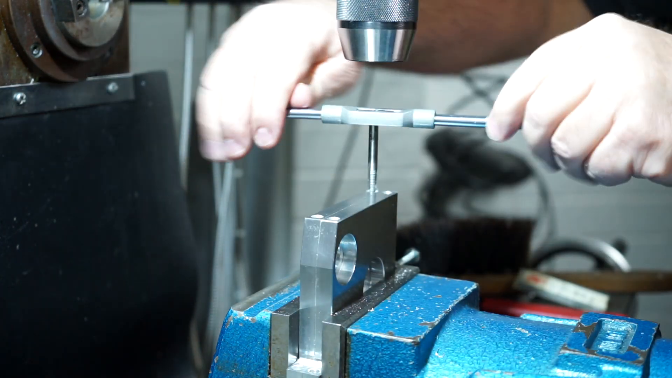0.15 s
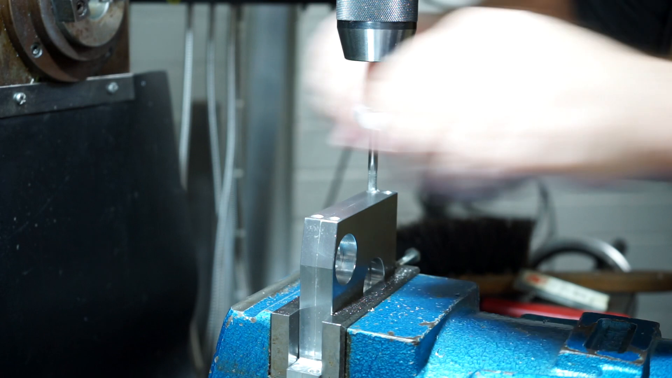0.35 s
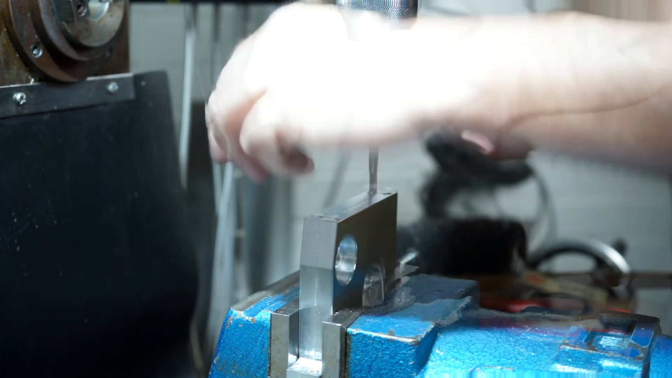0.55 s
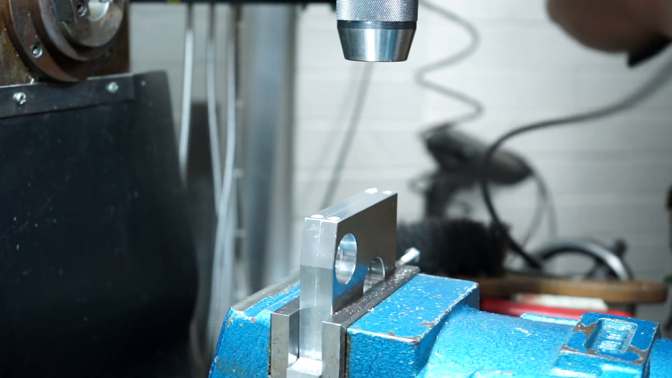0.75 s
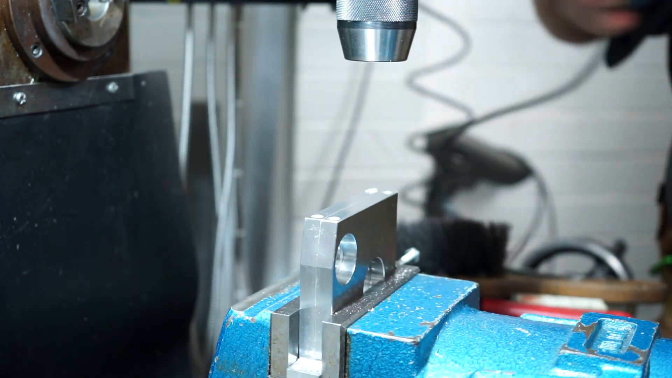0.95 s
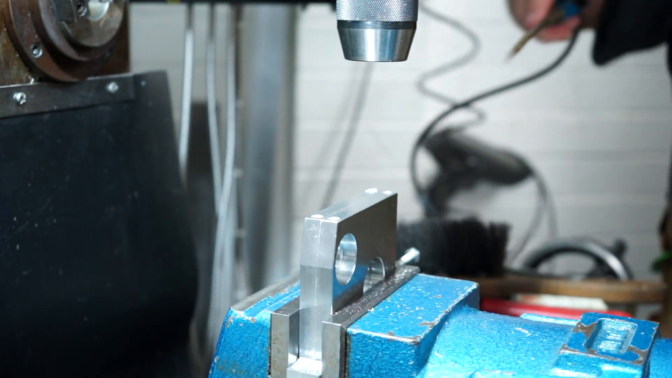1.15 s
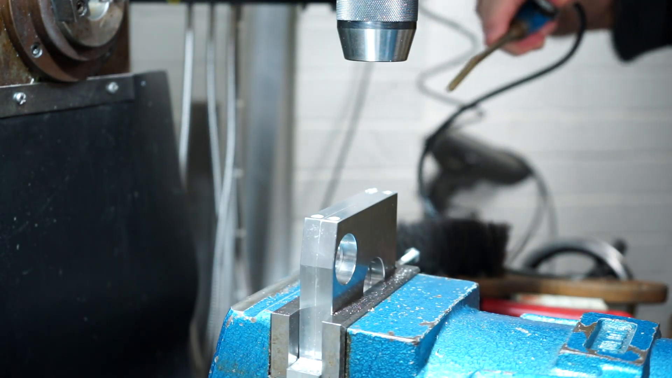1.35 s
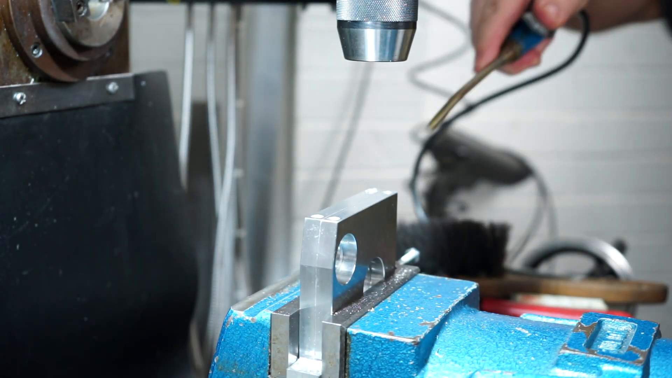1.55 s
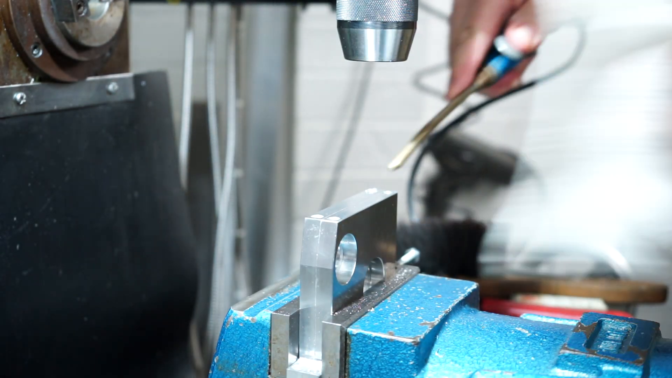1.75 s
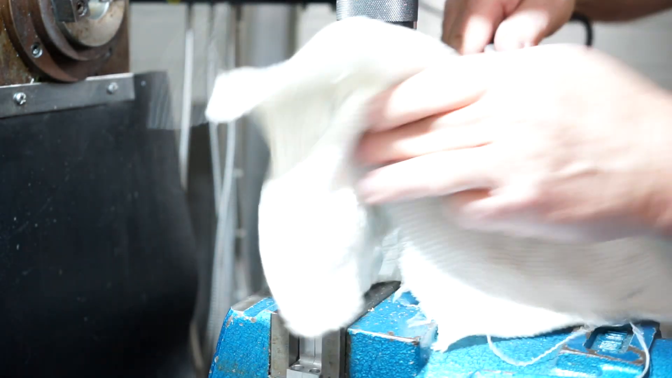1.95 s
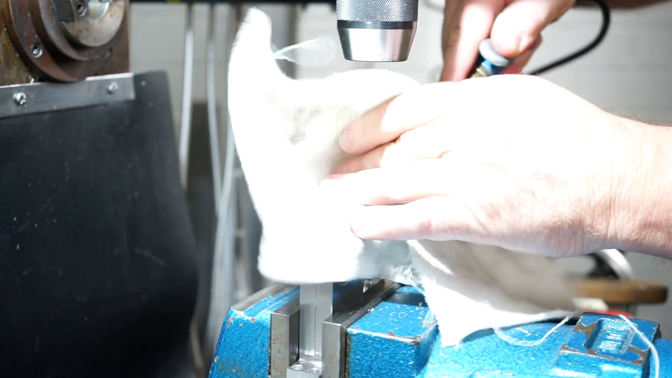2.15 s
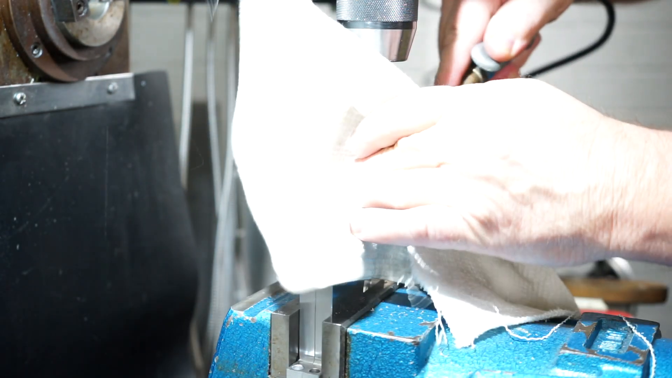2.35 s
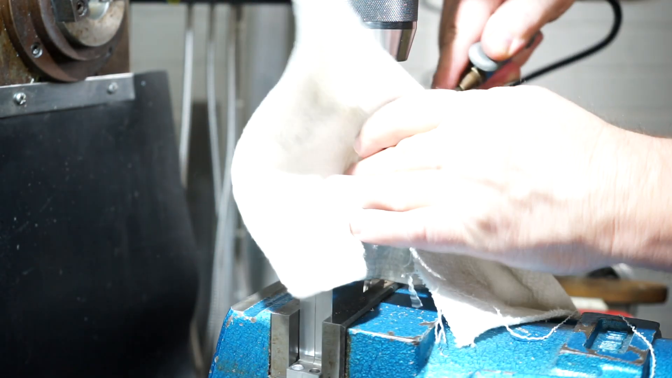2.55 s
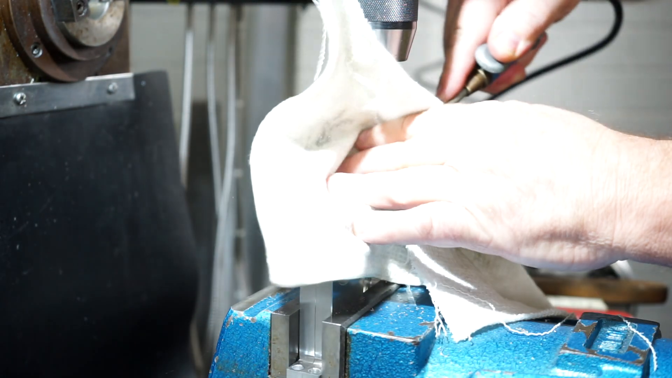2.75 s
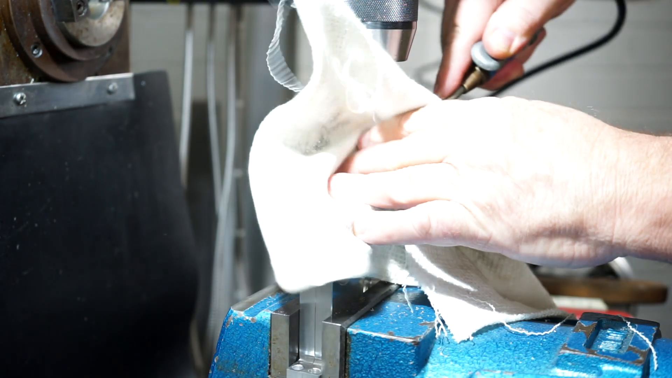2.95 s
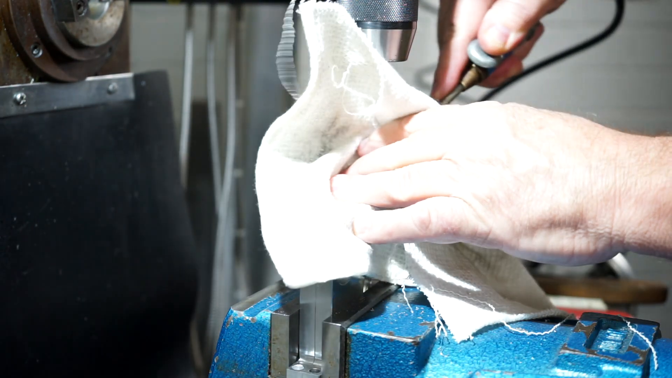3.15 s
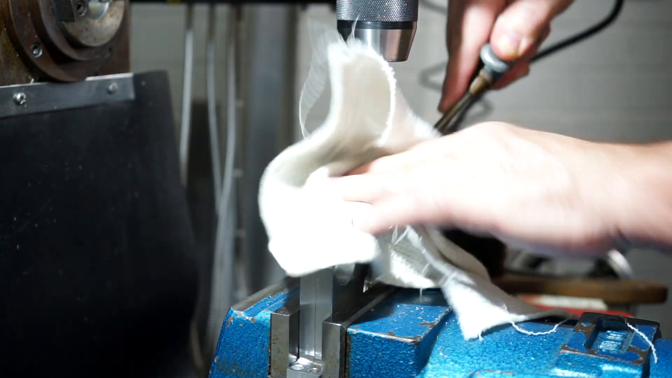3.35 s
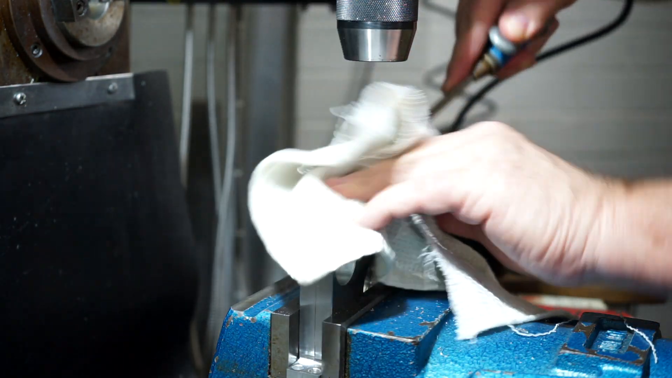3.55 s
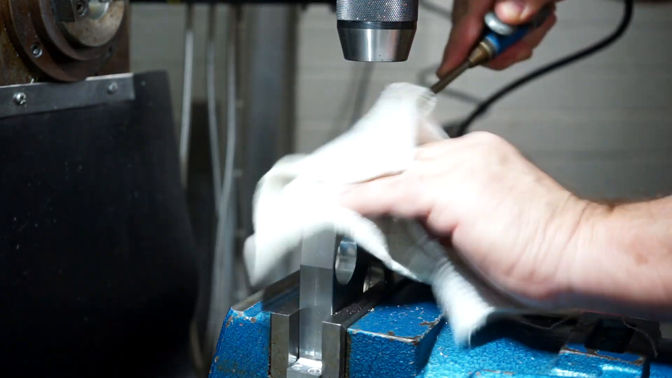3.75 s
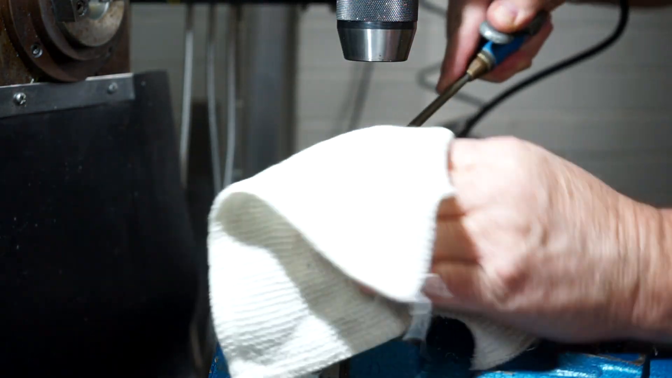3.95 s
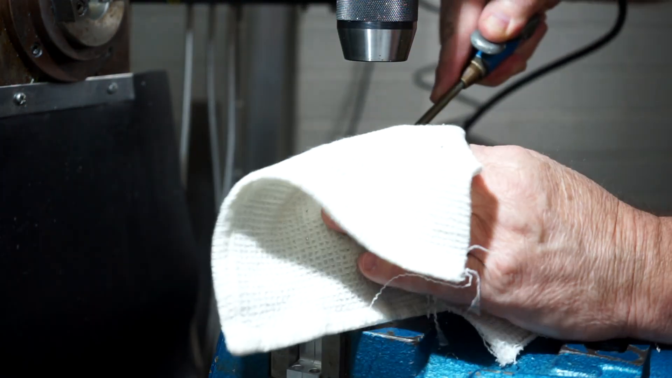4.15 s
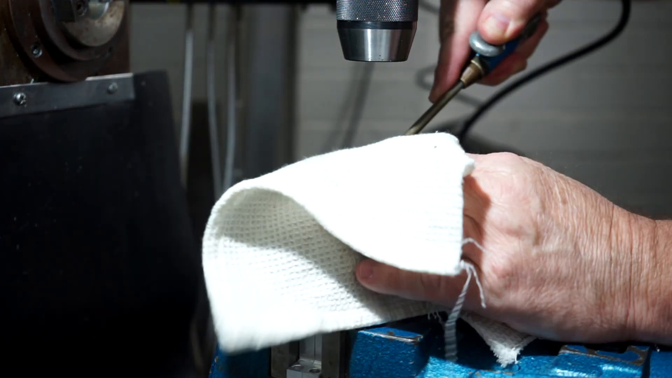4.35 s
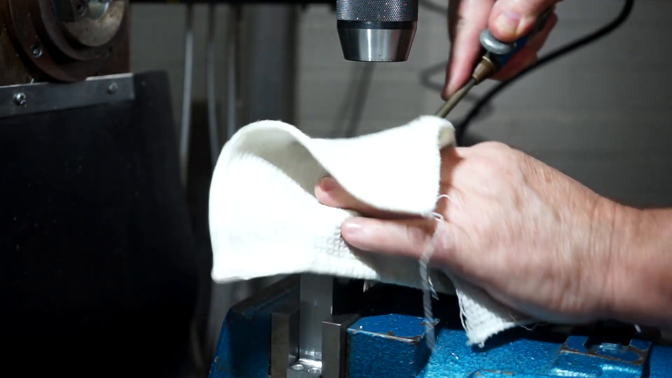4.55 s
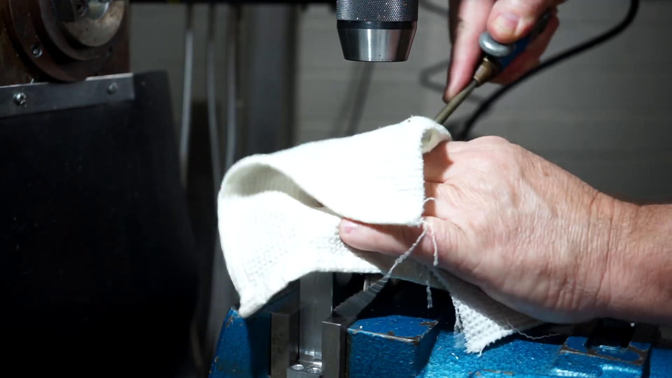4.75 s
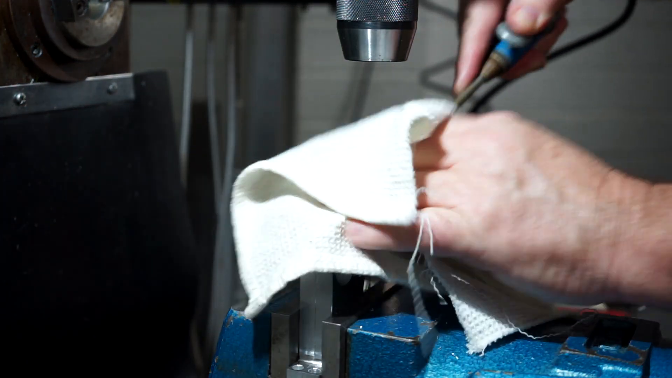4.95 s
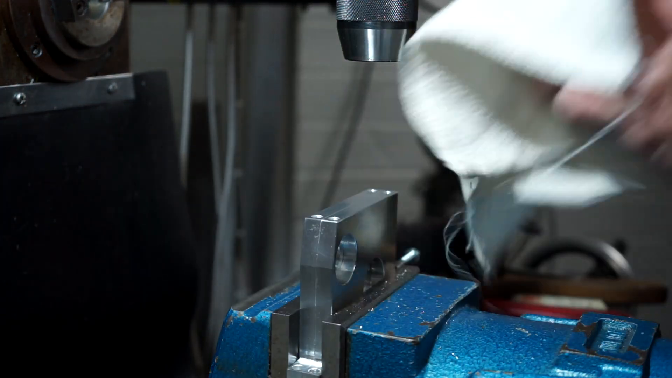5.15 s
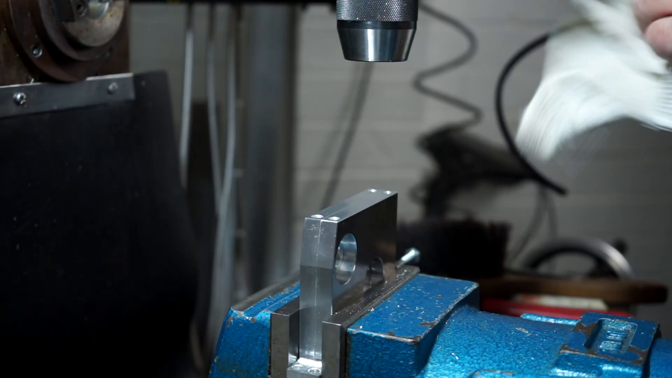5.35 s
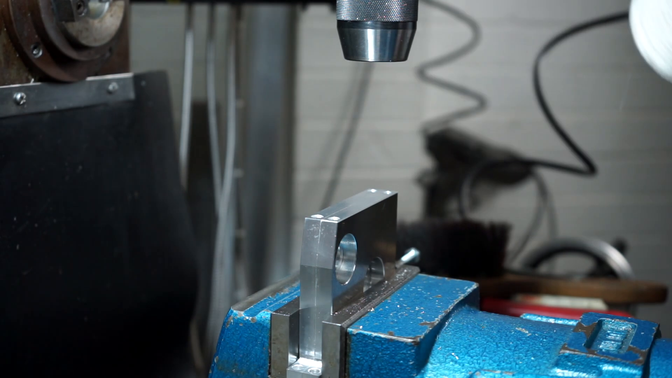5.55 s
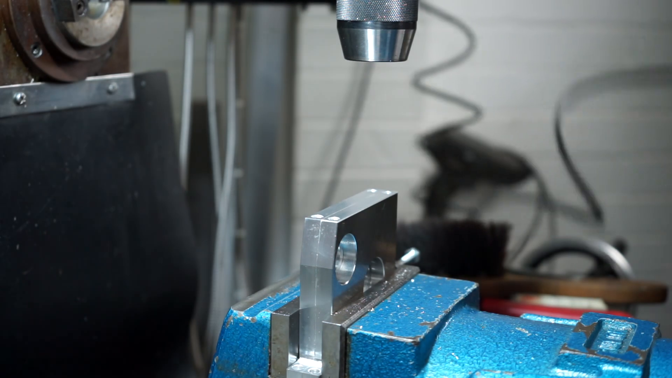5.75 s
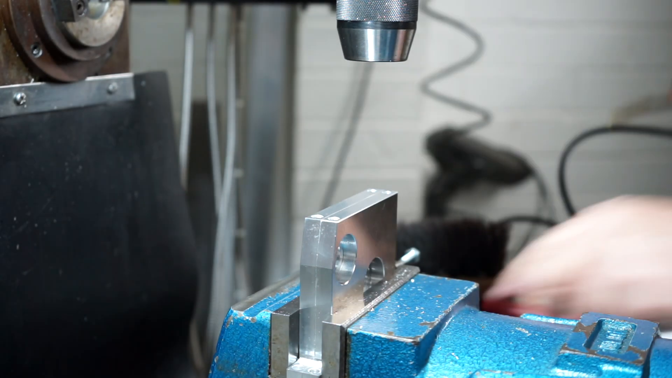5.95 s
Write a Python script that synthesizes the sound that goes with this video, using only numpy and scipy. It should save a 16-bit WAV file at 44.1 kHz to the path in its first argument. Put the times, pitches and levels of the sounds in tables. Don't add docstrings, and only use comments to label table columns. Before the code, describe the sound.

In a workshop, a motor drones while an air gun sprays twice through a rag, with piercing chirps and a leaking hiss between.

```python
import sys
import numpy as np
from scipy import signal
from scipy.io import wavfile
from scipy.ndimage import uniform_filter1d, minimum_filter1d

SR = 44100
rng = np.random.default_rng(int(sys.argv[2]) if len(sys.argv) > 2 else 0)


def store_pcm(level_fs):
    pcm = np.round(np.clip(level_fs, -1, 1) * 32767).astype(np.int16)
    wavfile.write(sys.argv[1], SR, np.atleast_2d(pcm).T)


def invert_db(x):
    u = np.asarray(x, float) / 20
    return 10 ** u


N = 264159

# (time [s], gain [dB])
GAIN = [(0, 6.5), (.6, 6), (.68, -1.5), (1.3, 0.5), (2.02, 2.5), (2.05, -4.5), (2.2, -6.5), (3.3, -7.5),
        (3.9, -7), (4.3, -8), (5.1, -10), (5.99, -5.5)]
# (frequency [Hz], density [dB per Hz])
SHOP_COLOUR = [(12, -53.5), (20, -14), (93, -10), (277, -7.5), (319, -7.5), (472, -11), (624, -7.5),
               (825, -6.5), (976, -8), (1440, -12.5), (1760, -15), (1960, -14.5), (10800, -35.5),
               (13900, -41.5), (16000, -72)]
# (frequency [Hz], left-right likeness [-1 to 1])
SHOP_SAME = [(60, 0.944), (180, 0.92), (550, 0.88), (1650, 0.34), (4970, -0.16), (15000, -2)]
# (multiple of shaft speed [ratio], level [dB rms])
HUM = [(4, -53.5), (6, -59.5), (8, -60), (9.2, -64.5), (13, -52), (21, -63), (25, -58.5), (28.3, -62),
       (36, -60.5), (38, -60.5), (39, -55), (39.6, -60), (44, -65.5), (68, -62), (70, -69), (72, -65),
       (105, -68.5), (256, -78.5)]
SHOP_DB, SHAFT_HZ = -41, 24.98
SHOP_LAG = 3

# (time [s], peak level [dB],
# t60 [s], lowest [Hz], highest [Hz])
SCUFFS = [(.29, -53.5, 0.37, 5000, 11000), (0.509, -48, .5, 2500, 5500), (.09, -53, 0.092, 2500, 8000),
          (.79, -63.5, .1, 2500, 8000), (0.929, -40, .08, 600, 1100), (1.184, -45.5, 0.162, 2800, 8950),
          (1.39, -57, .15, 3000, 10000), (2.002, -35, .08, 3000, 14000), (4.955, -13.5, 0.05, 1500, 9000),
          (5.637, -57, 0.095, 1500, 8000), (5.839, -46.5, 0.13, 494, 2500),
          (5.849, -52.5, 0.089, 2000, 11000)]
RISE_PER_T60 = 0.058
# (frequency [Hz], t60 [s])
ROOM = [(200, .7), (2000, 0.46), (5000, 0.65), (9000, 0.6), (15000, 0.31)]
# (time [s], half length [s], rumble [dB], rustle [dB])
GRIPS = [
    (.154, .02, 4, 5),
    (.264, 0.044, 8.5, 9),
    (.4, .04, -2.1, 5),
    (.452, .025, 4.5, -5),
    (.54, .05, -4, 13),
]
RUMBLE_DB, RUSTLE_DB, HANDS_END_S, HANDS_END_DB_PER_S = -47, -59.5, 0.62, 400

# (frequency [Hz], density [dB per Hz])
JET_COLOUR = [(59, -61), (100, -15), (124, -30), (157, -27.5), (174, -40), (304, -14.5), (437, -17.5),
              (476, -14.5), (884, -10.5), (2410, 0), (9670, -1), (15500, -9.5), (16500, -44)]
LAYER_HZ = [7900, 14000, 1900, 550]
LAYER_DB = [-19, -39, -32.5, -47]
# (frequency [Hz], left-right likeness [0-1])
JET_SAME = [(60, 0.89), (180, 0.71), (550, 0.98), (1650, 0.67), (4970, 0.32), (15000, 0.041)]
# (frequency [Hz], left over right [dB])
JET_LEAN = [(60, 3.5), (240, 0), (950, -1), (3770, 1), (15000, 8)]
# (time [s], level [dB])
FLOW = [(1.9, -66), (1.975, -60), (2.013, -25.5), (2.11, -17), (2.2, -12), (2.45, -11.5), (2.62, -12.5),
        (3.22, -15.5), (3.39, -11), (3.57, -34.5), (3.7, -35.5), (3.86, -34.5), (3.97, -18.5), (4.1, -17),
        (4.3, -12.5), (4.5, -13), (4.88, -16.5), (5.03, -27)]
# (time [s], half length [s], change [dB])
SURGES = [(1.991, .011, -6), (2.096, 0.011, -4), (2.51, .009, -6), (2.55, 0.02, -3.5), (3.275, 0.014, 1),
          (3.31, 0.019, -5), (4.0, .02, -1), (4.22, .03, 0.37), (4.675, 0.0623, -4.5), (4.77, 0.051, 2.5),
          (4.93, .015, 0), (4.968, .022, 6)]
# (time [s], half length [s], splash [dB], buffeting [dB])
AIMS = [(2.09, .025, -6, -11), (2.2, .012, 0, -1.5), (2.36, .03, 2.3, 0), (2.43, .025, 2.5, 3.5),
        (2.508, .01, -4.5, -11.5), (2.525, .012, -3.5, 5.5), (2.595, 0.0432, 7, 12.5), (2.94, .04, 4.5, 2),
        (3.268, .015, 2.5, -7.5), (3.29, .012, -.6, -13), (3.335, .035, 6, 8.5), (3.5, .09, 5.5, 3.5),
        (3.76, .13, -3, -3), (4.03, .06, 4, 12.5), (4.125, 0.039, 4.5, 12.5), (4.198, 0.039, 12, 10.5),
        (4.3, .025, 2, -1.72), (4.38, .03, -6, -8), (4.44, .035, 0, 4), (4.57, .04, 0, -3.5),
        (4.69, .04, 2, 5), (4.75, .025, 1.5, -11), (4.85, .04, 3, 0.5), (5.03, .04, 0.5, -2)]
# (frequency [Hz], width [Hz], level [dB])
LEAK = [(2390, 35, -8), (3440, 94, -2), (4655, 140, -1), (8260, 99, -8), (10500, 41, -7), (12200, 38, -4.5),
        (12600, 240, -10.5)]
DYING_DB_PER_S = [145, 900, 80, 25]
FIZZ_DB, SPLASH_DB, BUFFET_DB = -16, -20.5, -32.5
FULL_DB, FIZZ_FOLLOWS, SPLASH_FOLLOWS, BUFFET_FOLLOWS = -12.5, 1.08, .9, 0.86
FIZZ_PER_BUFFET, PAN_DB, PAN_PER_FLOW, PAN_PER_BUFFET = .35, 0.2, .1, .08
SILENT_S = 5.4

# (peak time [s], rise [s], fall [s], peak level [dB], pitch [Hz])
ROAR_CALLS = [(2.006, .045, .018, -36, 3420), (2.3, .05, 0.062, -20.5, 3520), (2.526, .025, .06, -23, 3480),
              (2.95, .12, 0.066, -31, 3400), (3.275, .02, 0.018, -14.5, 4650), (3.84, .12, .08, -41, 3500),
              (3.936, .05, 0.066, -25.5, 3750), (4.215, .06, 0.013, -20, 3361),
              (4.31, .07, 0.076, -22.5, 3490), (4.46, .05, .08, -24, 3700), (4.49, .06, .09, -23.5, 4650),
              (4.575, .06, 0.043, -20.5, 3520), (4.745, .025, 0.0408, -22, 3710)]
# (peak time [s], rise [s], fall [s], peak level [dB], pitch
# [Hz])
HIGH_CALLS = [(2.011, 0.023, .06, -32, 9680), (2.499, .06, .06, -24, 11900),
              (3.286, 0.023, .026, -14, 11940), (3.956, 0.027, .08, -20, 11450),
              (4.276, 0.027, .05, -11.5, 11950), (4.355, 0.074, .035, -14.5, 11600),
              (4.5, 0.071, .01, -15, 12200), (4.526, .02, .02, -14, 11000),
              (4.778, .055, .035, -19.5, 11020), (4.972, 0.0176, .014, -11, 11630),
              (4.995, 0.013, .085, -27.5, 11460)]
# (time [s], pitch [Hz], level [dB], breathiness [0-1])
CHIRP_HIGH = [
    (2.065, 10500, -37, 0.7),
    (2.09, 11520, -5, 0.1),
    (2.115, 12440, -6, 0.2),
    (2.14, 12600, -18.5, 0.9),
    (2.165, 12200, -17, .9),
    (2.2, 12100, -23, .9),
]
# (start [s], length [s], peak level [dB], first pitch [Hz], last pitch [Hz])
THIN_CALLS = [
    (2.485, .065, -12, 11380, 11450),
    (4.515, .04, -16, 11050, 11000),
    (4.765, .04, -20.5, 11050, 11100),
]
# (time [s], pitch [Hz], level [dB], breathiness [0-1])
CHIRP_LOW = [
    (2.015, 3441, -40.5, 0.8),
    (2.023, 3493, -31.5, 0.96),
    (2.03, 3582, -10, 0.27),
    (2.045, 3905, -9.5, 0.15),
    (2.072, 4250, -9, 0.3),
    (2.088, 4330, -21, 0.5),
    (2.1, 4350, -37, .6),
]
# (start [s], length [s], peak level [dB], first pitch [Hz], last pitch [Hz])
LOW_CALLS = [
    (4.215, .055, -9, 3910, 4010),
    (4.773, 0.0664, -15.5, 3670, 3765),
    (4.849, .085, -7.5, 3820, 3760),
    (4.955, .04, -19, 3618, 3700),
    (4.988, .19, -28, 3828, 3770),
]
LOCK_S, LOW_BREATH, HIGH_BREATH, ROAR_BREATH = 0.0076, 0.5, 0.97, 0.73
START_DB, END_DB, OCTAVE_DB = -15.5, -14.5, -14

# (time [s], peak level [dB], length [s])
GUSTS = [(2.085, -43, 0.05), (2.422, -43.5, 0.043), (2.557, -51, 0.046), (2.987, -53, 0.05),
         (3.363, -49, 0.068), (4.504, -45, 0.044), (4.995, -58, 0.05)]
# (start [s], end [s], highest frequency kept [Hz])
DULL_MOMENTS = [(2.082, 2.116, 13000), (3.45, 3.92, 14500), (4.5, 4.55, 14600), (4.83, 4.92, 15100),
                (4.97, 5.035, 14000), (5.035, 5.3, 12200)]
SELF_NOISE_DB = -73


def evened(x):
    return x / np.sqrt(np.mean(x ** 2) + 1e-20)


def read(points, hz):
    f, value = np.transpose(points)
    return np.interp(np.log(hz + 1), np.log(f + 1), value)


def columns(rows, t):
    s, *values = np.transpose(rows)
    return [np.interp(t, s, v) for v in values]


def bumps(rows, t):
    s, half, *strengths = np.transpose(rows)
    return np.array(strengths) @ np.exp(-((t - s[:, None]) / half[:, None]) ** 4)


def band(x, lo_hz, hi_hz):
    sos = signal.butter(2, [lo_hz, min(hi_hz, SR / 2.1)], "bandpass", fs=SR, output="sos")
    return evened(signal.sosfilt(sos, x))


def grid(size):
    return np.arange(4 * N // size + 5) * size / 4 / SR, np.fft.rfftfreq(size, 1 / SR)


def noise(field_db, same, lean_db, patchy_db, flicker_db, wide=6, long=8):
    bins, frames = field_db.shape
    a, b, c, d, patches = rng.standard_normal((frames, bins, 5)).T
    flicker = evened(uniform_filter1d(patches[0], size=3))
    patches = uniform_filter1d(patches, max(round(wide), 1), 0)
    patches = evened(uniform_filter1d(patches, max(round(long), 1), 1))
    same = np.clip(same, -1, 1)[:, None]
    left = a + 1j * b
    right = same * left + np.sqrt(1 - same ** 2) * (c + 1j * d)
    z = np.array([left * invert_db(lean_db / 2), right / invert_db(lean_db / 2)])
    z *= invert_db(field_db + patchy_db * patches + flicker_db * flicker)
    size = 2 * bins - 2
    return signal.istft(z, nperseg=size, noverlap=size * 3 // 4)[1][:, :N]


def shop():
    frames, hz = grid(size=2048)
    field = read(SHOP_COLOUR, hz)[:, None] + 0 * frames
    wash = evened(noise(field, read(SHOP_SAME, hz), -1.1, patchy_db=1.7, flicker_db=0.97, wide=5, long=5))
    t, tones = np.arange(N) / SR, np.zeros((2, N))
    for (turns, db), draw in zip(HUM, rng.standard_normal((len(HUM), 3, 200))):
        phase_drift, level_drift, ear_drift = [np.interp(t, np.arange(200) / 25, v) for v in draw]
        f = turns * SHAFT_HZ
        phase = 2 * np.pi * f * t + 0.67 * phase_drift
        spread = .6 * min(f / 1500, 1) * ear_drift
        tones += np.sqrt(2) * invert_db(db + 2.2 * level_drift) * np.sin([phase, phase + spread])
    mix = invert_db(SHOP_DB - 3.5) * wash + tones * invert_db([[-1.1], [1.1]])
    left, right = mix * invert_db(columns(GAIN, t)[0])
    return np.array([np.roll(left, SHOP_LAG), right])


def hose_scuffs():
    out, t = np.zeros(N), np.arange(SR // 8) / SR
    for (s, db, t60, lo_hz, hi_hz), fizz in zip(SCUFFS, rng.standard_normal((len(SCUFFS), len(t)))):
        part = out[round(s * SR):][:len(t)]
        swelling = np.minimum(t / (RISE_PER_T60 * t60), 1)
        scrape = invert_db(db - 60 * t / t60) * swelling * band(fizz, lo_hz, hi_hz)
        part += scrape[:len(part)]
    return out


def room(x):
    taps = np.zeros((2, SR))
    at = np.arange(300, SR - 20, 20) + rng.integers(0, 20, (2, (SR - 301) // 20))
    np.put_along_axis(taps, at, rng.choice([-1., 1.], at.shape), 1)
    hz, t, z = signal.stft(taps, SR, nperseg=256)
    tail = signal.istft(z * invert_db(-60 * t / read(ROOM, hz)[:, None]), SR, nperseg=256)[1]
    tail *= invert_db(-14) / np.linalg.norm(tail[0])
    early = rng.integers(60, 900, (2, 6))
    np.put_along_axis(tail, early, 0.2 * rng.choice([-1., 1.], (2, 6)), 1)
    return signal.fftconvolve(x[None], tail, axes=1)[:, :N]


def hands():
    t = np.arange(N) / SR
    hands_fade_db = HANDS_END_DB_PER_S * np.maximum(t - HANDS_END_S, 0)
    rumble_db, rustle_db = bumps(GRIPS, t) + [[RUMBLE_DB], [RUSTLE_DB]] - hands_fade_db
    low, left, right = rng.standard_normal((3, N))
    rustle = np.array([band(left, 1500, 7000), band(right, 1500, 7000)])
    return invert_db(rumble_db) * band(low, 16, 110) + invert_db(rustle_db - 12.5) * rustle


def jet_layers(t):
    flow = columns(FLOW, t)[0] + bumps(SURGES, t)[0] - FULL_DB
    splash, buffet = bumps(AIMS, t)
    fizz_db = FIZZ_DB + FIZZ_FOLLOWS * flow + FIZZ_PER_BUFFET * np.maximum(buffet, 0)
    splash_db = SPLASH_DB + SPLASH_FOLLOWS * flow + splash
    buffet_db = BUFFET_DB + BUFFET_FOLLOWS * flow + buffet
    levels = FULL_DB + np.array([flow, fizz_db, splash_db, buffet_db])
    levels -= np.outer(DYING_DB_PER_S, np.maximum(t - FLOW[-1][0], 0))
    pan_db = PAN_DB + PAN_PER_FLOW * np.maximum(flow, -30) + PAN_PER_BUFFET * buffet
    return [*levels, pan_db]


def jet():
    t, hz = grid(size=512)
    *layers, pan_db = jet_layers(t)
    layers[1] = np.maximum(layers[1], layers[0] - 24)
    order = np.argsort(LAYER_HZ)
    field = read(JET_COLOUR, hz)[:, None]
    for k in range(4):
        share = np.interp(np.log(hz + 1), np.log(LAYER_HZ)[order], order == k)
        field = field + np.outer(share, layers[k] - LAYER_DB[k])
    hiss_bins = (hz > 5000) & (hz < 10000)
    hiss_power = np.sum(invert_db(2 * read(JET_COLOUR, hz[hiss_bins])))
    field += LAYER_DB[0] - 10 * np.log10(hiss_power) - 4
    ringing_db = sum(np.exp(-((hz - f) / (2.8 * width_hz)) ** 2) * (6.5 + 0.35 * db) for f, width_hz, db in LEAK)
    low_flow = np.clip((LAYER_DB[0] - layers[0] - 9.5) / 8, 0, 1)
    field += np.outer(ringing_db, low_flow)
    field -= 80 * ((t < FLOW[0][0]) | (t > SILENT_S))
    lean = read(JET_LEAN, hz)[:, None] + np.outer(np.clip(hz / 6000, 0, 1), pan_db - 5.5)
    return noise(field, read(JET_SAME, hz), lean, patchy_db=1.3, flicker_db=0.46)


def whistle(rows, wander, width_hz, octave_db):
    t = np.arange(rows[0][0], rows[-1][0], 1 / SR)
    hz, level_db, breathy = columns(rows, t)
    a, b, c = rng.standard_normal((3, len(t)))
    wandering_hz = hz * (1 + wander * evened(uniform_filter1d(a, size=150)))
    turn = np.exp(2j * np.pi * np.cumsum(wandering_hz) / SR)
    r = np.exp(-np.pi * width_hz / SR)
    fuzz = signal.lfilter([1], np.convolve([1, -r], [1, -r]), b + 1j * c)
    fuzz = fuzz / np.sqrt(np.mean(abs(fuzz) ** 2))
    breathy = np.clip(breathy, 0, 1)
    tone = turn * ((1 - breathy) + breathy * fuzz)
    tone = evened(tone.real) + invert_db(octave_db) * evened((tone * turn).real)
    out = np.zeros(N)
    out[round(t[0] * SR):][:len(t)] = invert_db(level_db) * tone * signal.windows.tukey(len(t), .15)
    return out


def swell(peak, rise, fall, db, hz, breathy):
    return [(peak - rise, hz, db + START_DB, breathy), (peak, hz, db, breathy), (peak + fall, hz, db + END_DB, breathy)]


def locked(start, length, db, first_hz, last_hz):
    lock_hz = first_hz + (last_hz - first_hz) * LOCK_S / length
    return [(start, first_hz, db - 14.5, LOW_BREATH), (start + LOCK_S, lock_hz, db, LOW_BREATH),
            (start + length, last_hz, db - 22.5, LOW_BREATH)]


def hole_roar():
    calls = [swell(*row, ROAR_BREATH) for row in ROAR_CALLS]
    return sum(whistle(rows, wander=0.017, width_hz=310, octave_db=-59.5) for rows in calls)


def third_mode():
    calls = [CHIRP_HIGH] + [swell(*row, HIGH_BREATH) for row in HIGH_CALLS]
    fuzzy = sum(whistle(rows, wander=0.01, width_hz=1100, octave_db=-59.5) for rows in calls)
    thin = sum(whistle(locked(*row), wander=0.003, width_hz=250, octave_db=-61) for row in THIN_CALLS)
    return fuzzy + thin


def first_mode():
    calls = [CHIRP_LOW] + [locked(*row) for row in LOW_CALLS]
    return sum(whistle(rows, wander=0.0049, width_hz=230, octave_db=OCTAVE_DB) for rows in calls)


def gusts():
    t, puffs = np.arange(N) / SR, np.zeros(N)
    for s, db, length in GUSTS:
        puffs += invert_db(db - 4.5) * np.exp(-((t - s - length / 2) / (length / 2)) ** 2)
    return puffs * band(rng.standard_normal(N), 45, 260)


def scene():
    scuffs = hose_scuffs()
    low = invert_db(2.0) * first_mode() + invert_db(-3.0) * hole_roar()
    high = invert_db(1.0) * third_mode()
    direct = np.array([low + high, np.roll(low, 3) + np.roll(high, 1)])
    return shop() + direct + scuffs + room(low + high + scuffs) + hands() + jet() + gusts()


def band_limit(x):
    return signal.sosfilt(signal.butter(12, 16800, fs=SR, output="sos"), x)


def record(dry):
    hiss_db = SELF_NOISE_DB + .8 * columns(GAIN, np.arange(N) / SR)[0]
    dry = dry + invert_db(hiss_db) * band(rng.standard_normal(dry.shape), 12000, 14000)
    ceiling = .74
    gain = minimum_filter1d(ceiling / np.maximum(abs(dry).max(0), ceiling), size=201)
    limited = dry * uniform_filter1d(gain, size=101)
    hz, t, z = signal.stft(limited, SR, nperseg=512, noverlap=384)
    edge_hz = np.full(len(t), 15880.)
    for start, end, kept_hz in DULL_MOMENTS:
        edge_hz[(t > start) & (t < end)] = kept_hz
    mix = signal.istft(z * (hz[:, None] < edge_hz), SR, nperseg=512, noverlap=384)[1][:, :N]
    return band_limit(mix)


dry = scene()
out = record(dry)
store_pcm(out)
```